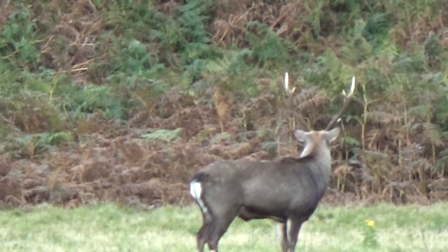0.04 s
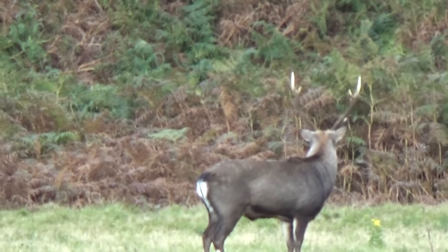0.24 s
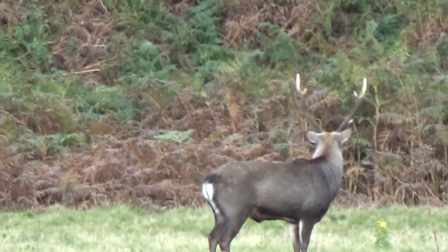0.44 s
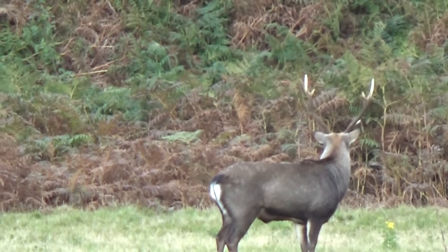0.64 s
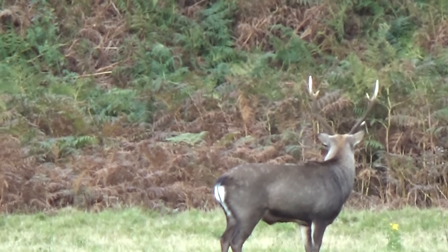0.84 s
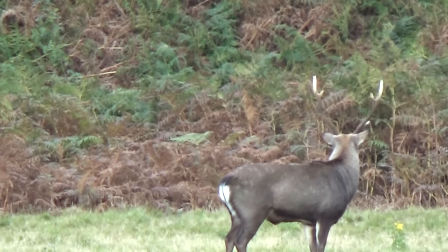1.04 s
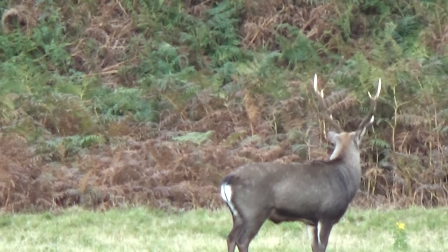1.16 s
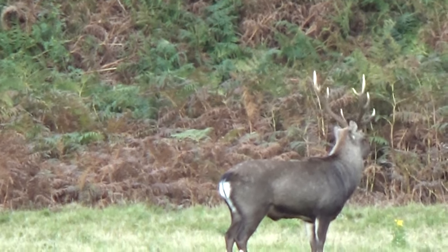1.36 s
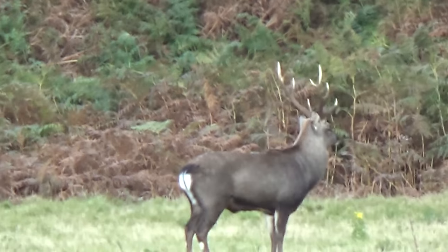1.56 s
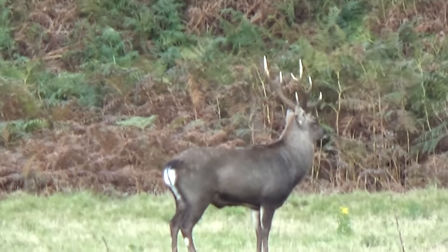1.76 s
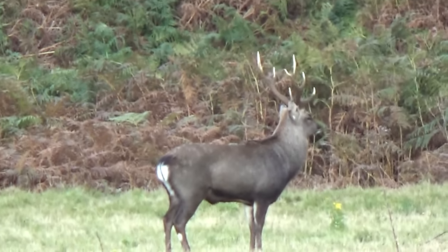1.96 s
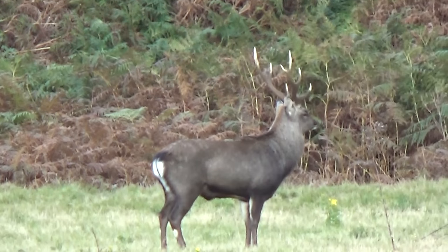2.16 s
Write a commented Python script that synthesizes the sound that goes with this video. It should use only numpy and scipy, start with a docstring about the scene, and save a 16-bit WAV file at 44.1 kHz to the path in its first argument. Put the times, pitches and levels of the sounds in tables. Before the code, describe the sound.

A stag's loud, shrill whistle, begun before the start, slides down in steps, roughens into a hoarse low groan and stops before one second; then open-field wind rumble and hiss, heard from some way off.

```python
"""A deer's whistle, already under way, slides down in steps over an open field, the camera some way off. Its
voice is a stack of harmonic partials whose odd members come and go; it grows hoarse and stops at 0.8 s. Noise
bands under it make wind rumble and a far rush of air; the 1.2-4 kHz band is loud at first, sinks, then
recovers. After the call the camera's gain control climbs back, raising the field; narrow-band noise then pulses
faintly at high pitch, and one tiny far chirp, a short sine, sounds near 1.9 s."""
import sys
import numpy as np
from scipy import signal
from scipy.fft import rfft, irfft
from scipy.io import wavfile
from scipy.ndimage import uniform_filter1d

SR = 44100
rng = np.random.default_rng(int(sys.argv[2]) if len(sys.argv) > 2 else 0)


def wav_out(sig):
    """Save sig, one row per channel (or a flat mono array), as 16-bit PCM at SR to the path in sys.argv[1]."""
    wavfile.write(sys.argv[1], SR, np.round(np.clip(np.atleast_2d(sig).T, -1, 1) * 32767).astype(np.int16))


def undo_db(level):
    """Turn decibels back into plain size, where 20 dB means ten times bigger."""
    steps = np.asarray(level, float) / 20
    return 10 ** steps


N = 97593

# Spectral density of the field: frequency_hz, density_db (dB per Hz, relative)
FIELD_SPECTRUM = [(15, -47), (25, -18), (59, -2), (140, -.5), (227, -10), (322, -10.5), (457, -13.5),
                  (684, -13.5), (1380, -26), (2700, -34), (4380, -45), (5600, -38.5), (7500, -42),
                  (10100, -40.5), (13000, -48.5), (15500, -52)]
# Left-right balance of the field: frequency_hz, left_over_right_db
FIELD_BALANCE = [(60, 0.13), (110, -0.82), (200, -5), (380, -7), (700, -5.5), (1290, -4.5), (2380, -4.5),
                 (4400, -2), (8120, 2.15), (15000, -1.28)]
# Level changes of the field noise: start_s, wind_on_microphone_db, rush_of_air_db, upper_band_db (1.2-4 kHz)
FIELD_COURSE = [(0, 10.5, 17, 13.5), (.08, 14.5, 14, 14.5), (.14, 9.5, 7.5, 8), (.3, 9, 6, 4.5),
                (.45, 1.5, 1.5, 0.5), (.59, -3, -3, -3.5), (.7, 7.5, 4, -7.5), (.84, 2, 4.5, -4),
                (1.1, 2.5, 2.5, -.5), (1.29, 3.5, 3, 1.53), (1.63, 2.5, -1.51, 2.5), (1.87, 0, 0.8, 2.45),
                (2.08, 7.5, -1, 2.74), (2.14, 2, -1, 2.45), (2.21, 1, .8, 2.84)]
# Share of each level change in a band: frequency_hz, wind_share, rush_share, upper_band_share (factors)
FIELD_REACH = [(60, 0.981, .01, .01), (160, 0.801, 0.12, .01), (300, .2, 0.794, 0.0091),
               (800, 0.0092, 1, .1), (1490, .01, .1, 1), (3470, .01, .05, 0.72), (6000, .01, 0.091, 0.18)]
# Pulses of faint high hiss: centre_s, length_s, level_db (before gain control)
HISS_PULSES = [(.94, .035, -76.5), (1.122, 0.0178, -76.5), (1.324, 0.037, -74), (1.517, 0.028, -75.5),
               (1.621, 0.0205, -83), (1.731, .015, -78.5), (1.828, 0.024, -82.5), (1.911, 0.0346, -81),
               (2.019, 0.0183, -78.5), (2.103, 0.028, -82)]
# Course of the whistle: start_s, pitch_hz, level_db (before the path), odd_partials_db,
# tilt_db_per_octave, lean_factor (scales the stereo lean)
CALL = [(0.0, 2247, -46.0, 12.5, -7.5, 0.69), (0.025, 2234, -38, 3.5, -6.5, 0.88),
        (0.045, 2166, -40, 7, -5, 0.43), (0.07, 2113, -39.0, 7.5, -4.5, 0.21),
        (0.1, 2066, -38, 2, -5, 0.25), (0.13, 2014, -42.5, 2, -6.5, 0.46),
        (0.165, 1997, -43.5, 2.5, -4.5, 0.65), (0.2, 1981, -44, 2.5, -4.5, 0.81),
        (0.235, 1989, -44, 2, -4.5, 0.91), (0.27, 1999.0, -44.0, 1.5, -5, 0.98),
        (0.29, 1994.0, -45, 2.5, -4, 0.91), (0.31, 1976.0, -44.5, 1.62, -3.4, 1.04),
        (0.34, 1910, -46.5, 6, -3.5, 0.92), (0.37, 1847, -49.5, 7, -3, 0.9),
        (0.42, 1729.0, -48, 1.5, -5, 0.93), (0.43, 1697, -46, 1.5, -4, 0.86),
        (0.438, 1670, -47, -1.2, 1, 0.83), (0.4445, 1427, -41.5, -1, -4, 0.55),
        (0.47, 1420, -42, -1.73, -3.5, 0.64), (0.51, 1398, -41.5, -5, -2.5, 0.71),
        (0.55, 1352, -44.5, -3.5, -3, 0.87), (0.58, 1271, -45.0, 4, -4.5, 0.69),
        (0.605, 1197, -45.5, -0.5, -1, 0.69), (0.619, 1134, -45.5, -8, -3.5, 0.72),
        (0.625, 1039, -43.5, -6, -3, 0.86), (0.645, 984.8, -43.5, -11, -5, 0.88),
        (0.67, 855.0, -40.5, -6.5, -4.5, 0.76), (0.684, 802.7, -39.5, 2.49, -5, 0.54),
        (0.693, 728.0, -39.5, 5, -7.5, 0.71), (0.705, 703.1, -40.0, 2.47, -6, 0.67),
        (0.72, 665.9, -41.5, -11.5, -4.5, 0.57), (0.735, 607.0, -45, -6, -2.5, 0.58),
        (0.744, 537, -44.5, -8.5, -4, 0.58), (0.751, 488.2, -44.5, 5, -5.5, 0.81),
        (0.76, 451.2, -50, 6.5, -6, 0.51), (0.772, 403.8, -57.5, 5.5, -7.5, 0.8),
        (0.785, 370.0, -59, 9, -8.5, 0.51)]
# Throat, ground and camera body together: frequency_hz, mouth_open_db,
# lean_left (side over mid, before scaling), mouth_closing_db
PATH = [(400.0, -3, -0.68, -7), (880, -5, 0.28, -8.5), (1185, -5.5, -0.27, -5.5), (1477, 6.4, 0.45, -3.5),
        (1994, 7.5, 1.0, 9.5), (2460, -4.5, 1.75, 8), (2837, 3.5, 1.057, 8.5), (3232, 10.5, 0.824, 3.5),
        (3704, 14.5, 1.06, 5.5), (4076, 7.5, 0.95, 4.5), (4515, 3, -0.27, -2.5), (5340, 4.5, 0.15, 4.5),
        (5785, -12.5, 0.19, 1.5), (6090, -2.5, -0.34, 10), (6526, 7.5, 0.01, 9.5), (7024, 20, 0.25, 13.0),
        (7624, 7.5, -0.03, 12.5), (8611, 0.5, -0.36, 2), (8895, -6.5, -0.11, 9.0), (9670, -6.5, -0.04, 5.5),
        (10205, -1.5, 0.0, 10.0), (10763, -1.5, 0.26, -8), (10914, -10, 0.33, -11.5), (11720, -8, -0.03, 3),
        (12650, 1.35, 0.53, -8.5), (13900.0, -7.5, -0.04, -24), (14300.0, -7, 0.02, -21),
        (14865, 9, -0.0, -2), (15560, -8.5, 0.0, -16.5)]
# Vocal fold shape, partial 1 upward: level_db; higher partials share the last
FOLD_DB = [-15.5, 8.5, -8, 6, -1.58, 6.5, 0.5, 4, 0.5, 1.16, 1.5, 0.36]
# Phase by which the left channel leads where nothing leans: frequency_hz, lead_rad
LEFT_LEAD = [(4500, 0.01), (5400, -0.6), (6200, -0.3), (7100, -0.6), (8300, -0.1), (9800, -0.7),
             (10800, 0.3), (12000, 0.01)]
# Hoarseness: start_s, wobble_db (pitch and level), breath_db
HOARSENESS = [(0, 2, -1), (.1, .1, -4), (.42, .1, -4), (.445, 7, 10), (.48, 1, -2), (.6, 3, 3),
              (.65, 8, 16), (.69, 14, 24), (.72, 12, 22), (.75, 16, 26), (.785, 20, 30)]


def along(table, col, at, log=False):
    """Linear interpolation in a table column, on a logarithmic first axis if asked."""
    rows = np.array(table, float)
    if log:
        return np.interp(np.log(at), np.log(rows[:, 0]), rows[:, col])
    return np.interp(at, rows[:, 0], rows[:, col])


def walk(rate_hz, size=N):
    """Low-pass random process: white noise averaged twice, scaled to standard deviation 1."""
    width = max(int(SR / rate_hz), 2)
    drift = uniform_filter1d(uniform_filter1d(rng.standard_normal(size), width), width)
    return drift / drift.std()


def band(hz, octaves):
    """Band-pass noise: a Gaussian weighting on a log-frequency axis, scaled to rms 1."""
    f = np.maximum(np.fft.rfftfreq(N, 1 / SR), 1)
    bell = np.exp(-(np.log2(f / hz) / octaves) ** 2)
    noise = irfft(rfft(rng.standard_normal(N)) * bell, N)
    return noise / noise.std()


def field(t):
    """Sum of third-octave noise bands: wind, rush and the upper-band course each move a band by a share; each
    flickers alone."""
    level_db = -52  # before the level changes and gain control
    unrelated = .08  # share of noise that differs between the channels
    buffet_db, buffet_hz, flicker_db, flicker_hz = 0.88, 24.97, 0.94, 11
    wind = along(FIELD_COURSE, 1, t) + buffet_db * walk(buffet_hz)
    rush = along(FIELD_COURSE, 2, t)
    upper_band = along(FIELD_COURSE, 3, t)
    out, total_power = 0, 0
    for hz in 20 * 2 ** np.arange(0, 9.7, 1 / 3):
        # density times the square root of a width proportional to hz
        gain = undo_db(along(FIELD_SPECTRUM, 1, hz, True)) * np.sqrt(hz)
        balance = undo_db(along(FIELD_BALANCE, 1, hz, True))
        side = (balance - 1) / (balance + 1)
        mid = band(hz, .25)
        apart = side * mid + unrelated * min(hz / 300, 1) * band(hz, .25)
        swing_db = along(FIELD_REACH, 1, hz, True) * wind
        swing_db = swing_db + along(FIELD_REACH, 2, hz, True) * rush
        swing_db = swing_db + along(FIELD_REACH, 3, hz, True) * upper_band
        swing_db = swing_db + flicker_db * walk(flicker_hz)
        out = out + gain * undo_db(swing_db) * np.array([mid + apart, mid - apart])
        total_power = total_power + gain ** 2
    return out * undo_db(level_db) / np.sqrt(total_power)


def pulsing_hiss(t):
    """Amplitude modulation: Gaussian pulses at uneven times shape a narrow noise band."""
    envelope = sum(undo_db(db) * np.exp(-((t - centre) / length) ** 2) for centre, length, db in HISS_PULSES)
    return band(10156, 640 / 10156) * envelope


def far_chirp(t):
    """A tone burst: one sine under a Gaussian envelope."""
    centre_s, pitch_hz, length_s = 1.888, 4050, .002
    level_db = -69  # before gain control
    envelope = undo_db(level_db) * np.exp(-((t - centre_s) / length_s) ** 2)
    return envelope * np.sin(2 * np.pi * pitch_hz * t)


def whistle(t, phase, pitch, level_db, wobble):
    """Additive synthesis: harmonics of one pitch, filtered by the path and placed by level and phase."""
    shimmer_db, shimmer_hz, shimmer_cap_db = .5, 121, 3.0  # shimmer_db before hoarseness
    lean_per_db, lean_ref_db = .02, -29  # louder partials lean further
    mouth_closes_s, mouth_takes_s = 0.3697, 0.3174
    closing = np.clip((t - mouth_closes_s) / mouth_takes_s, 0, 1)
    out = np.zeros((2, len(t)))
    for k in range(1, 33):
        hz = k * pitch
        db = level_db + (k % 2) * along(CALL, 3, t)
        db = db + np.log2(k / 2) * along(CALL, 4, t)
        db = db + (1 - closing) * along(PATH, 1, hz, True) + closing * along(PATH, 3, hz, True)
        db = db + FOLD_DB[min(k, len(FOLD_DB)) - 1]
        shimmer = shimmer_db * wobble * walk(shimmer_hz, len(t))
        db = db + shimmer_cap_db * np.tanh(shimmer / shimmer_cap_db)
        lean = along(PATH, 2, hz, True) * along(CALL, 5, t)
        lean = lean * np.clip(1.5 + lean_per_db * (db - lean_ref_db), 0, 2)
        # the imaginary part turns the two channels apart in phase
        side = lean + 1j * np.tan(along(LEFT_LEAD, 1, hz, True) / 2)
        turning = np.exp(1j * (k * phase + 2 * np.pi * rng.random()))
        tone = np.sqrt(2) * undo_db(db) * (hz < 17000) * turning
        out += np.real(tone * np.array([1 + side, 1 - side]))
    return out


def breath(t, phase, level_db):
    """Turbulence noise of the throat, filtered by the closing mouth and modulated once per pitch period."""
    breath_db = -35  # against the call level, before hoarseness
    f = np.maximum(np.fft.rfftfreq(len(t), 1 / SR), 1)
    air = irfft(rfft(rng.standard_normal(len(t))) * undo_db(along(PATH, 3, f, True)), len(t))
    return air * undo_db(level_db + breath_db + along(HOARSENESS, 2, t)) * (1 + np.cos(phase))


def scatter(direct, t):
    """Diffuse reflection: convolution with exponentially decaying noise of unit energy."""
    echo_db, t60_s = -17, .04
    size = int(.15 * SR)
    tail = rng.standard_normal((1, size)) * undo_db(-60 * t[:size] / t60_s)
    tail = tail / np.sqrt((tail ** 2).sum(axis=1, keepdims=True))
    return undo_db(echo_db) * signal.fftconvolve(direct, tail, axes=1)[:, :len(t)]


def deer():
    """Source and path: a sliding, jittering pitch drives the whistle and its breath; both are scattered."""
    close_s, release_s = .781, .012  # the release falls 60 dB per release_s
    jitter, jitter_hz = .0008, 400  # jitter as a fraction of pitch, before hoarseness
    t = np.arange(int(.85 * SR)) / SR
    wobble = undo_db(along(HOARSENESS, 1, t))
    pitch = along(CALL, 1, t) * (1 + jitter * wobble * walk(jitter_hz, len(t)))
    phase = 2 * np.pi * np.cumsum(pitch) / SR
    level_db = along(CALL, 2, t) - 60 * np.maximum(t - close_s, 0) / release_s
    voice = whistle(t, phase, pitch, level_db, wobble) + breath(t, phase, level_db)
    voice = voice + scatter(voice, t)
    return np.pad(voice, ((0, 0), (0, N - len(t))))


def scene():
    """Superposition: the deer, the field and the faint high sounds add linearly."""
    t = np.arange(N) / SR
    return deer() + field(t) + pulsing_hiss(t) + far_chirp(t)


def band_limit(x):
    """A steep low-pass at the top of the band."""
    return signal.sosfilt(signal.butter(12, 15660, fs=SR, output="sos"), x)


def record(dry):
    """Automatic gain control: gain drops at once under a loud sound and climbs back exponentially."""
    gain_up_db, loud_db, recover_s = 8, -34.5, 0.334  # recover_s is a time constant
    power = uniform_filter1d(np.mean(dry ** 2, axis=0), 900)
    loud = power > undo_db(loud_db) ** 2
    last_loud = np.maximum.accumulate(np.where(loud, np.arange(N), 0))
    since_s = (np.arange(N) - last_loud) / SR
    mix = dry * undo_db(gain_up_db * (1 - np.exp(-since_s / recover_s)))
    return band_limit(mix)


dry = scene()
out = record(dry)
wav_out(out)
```